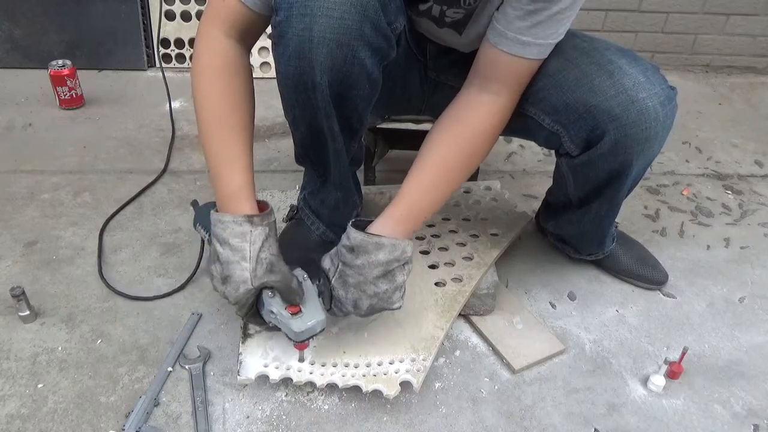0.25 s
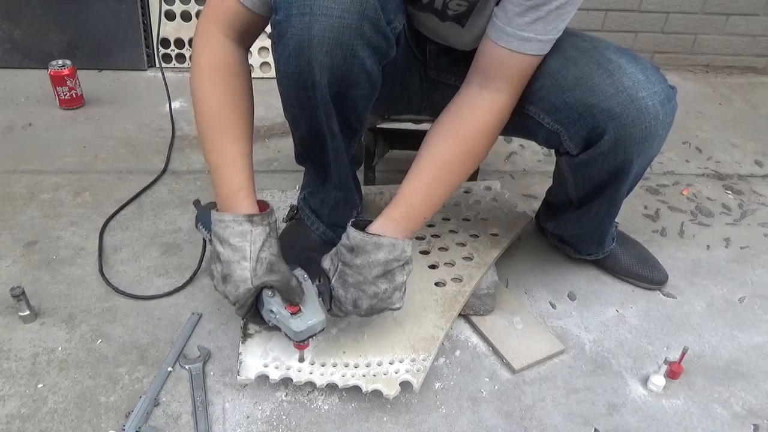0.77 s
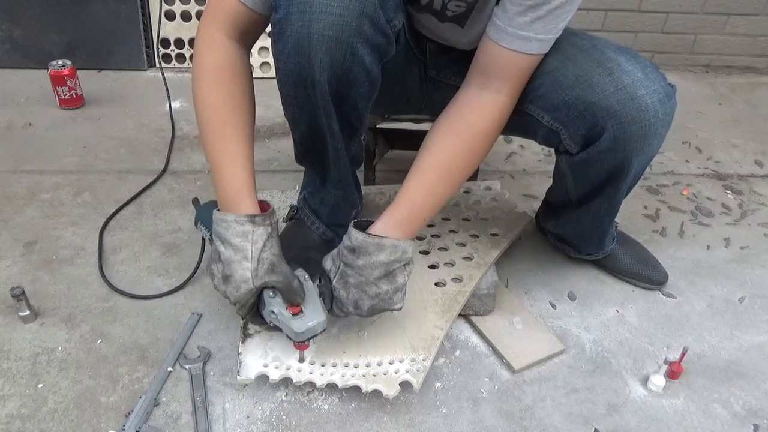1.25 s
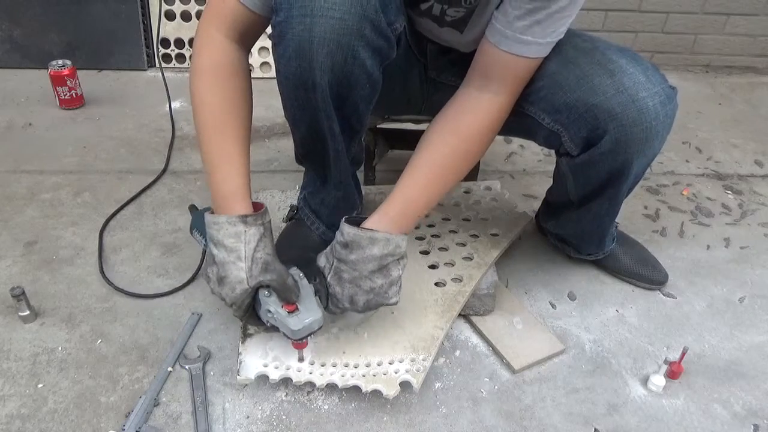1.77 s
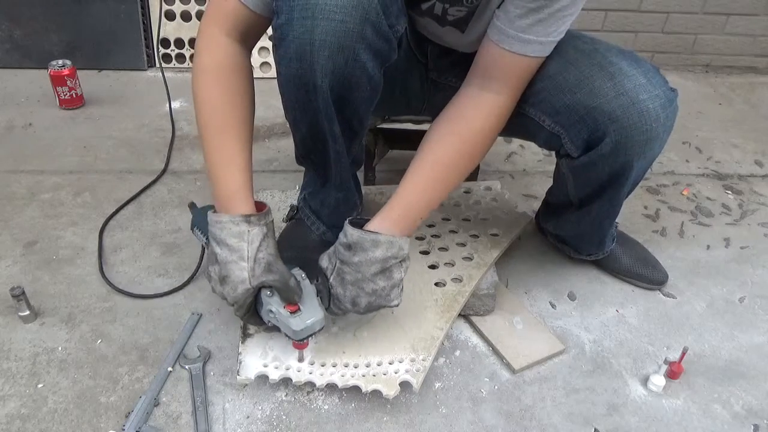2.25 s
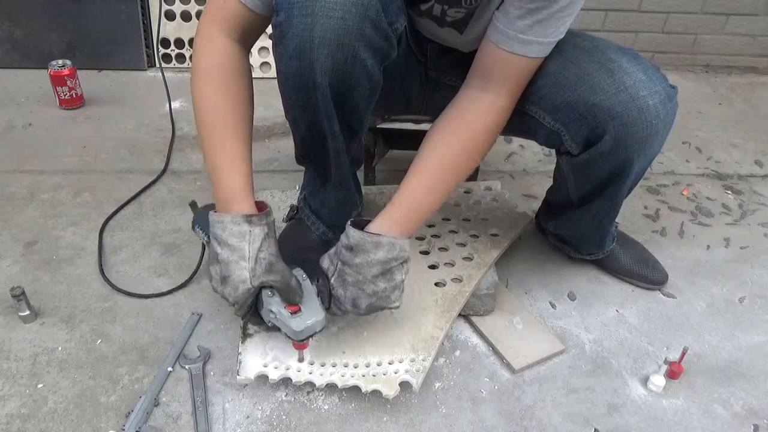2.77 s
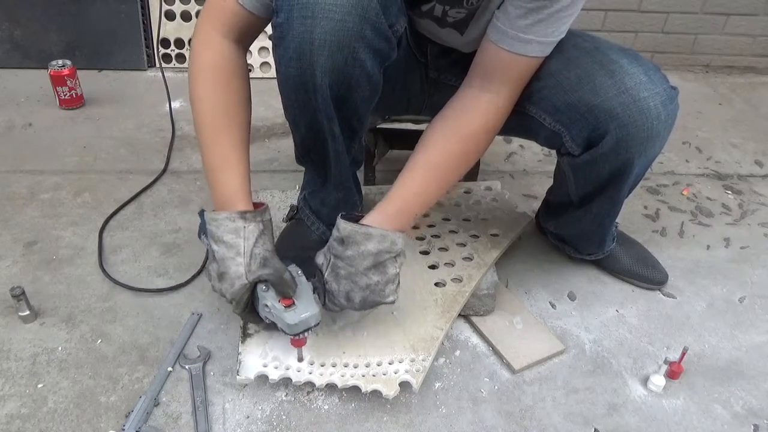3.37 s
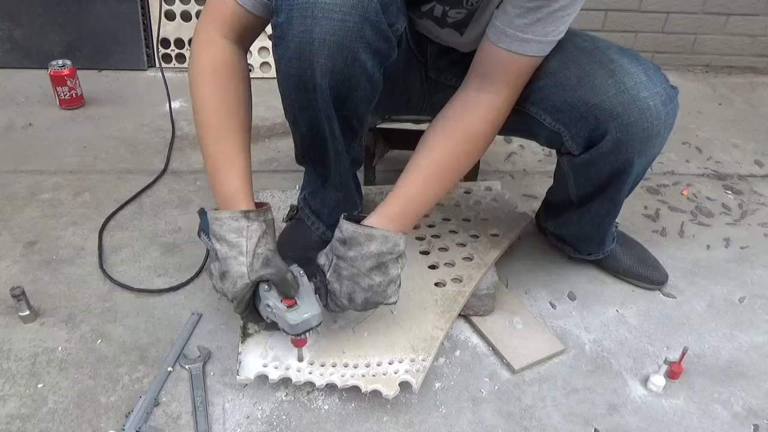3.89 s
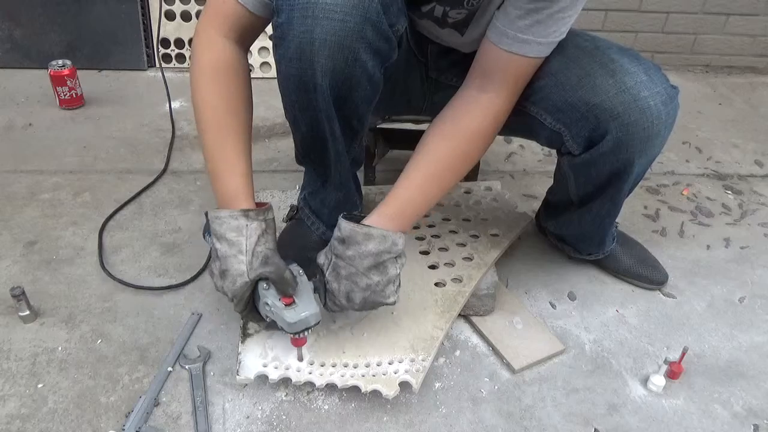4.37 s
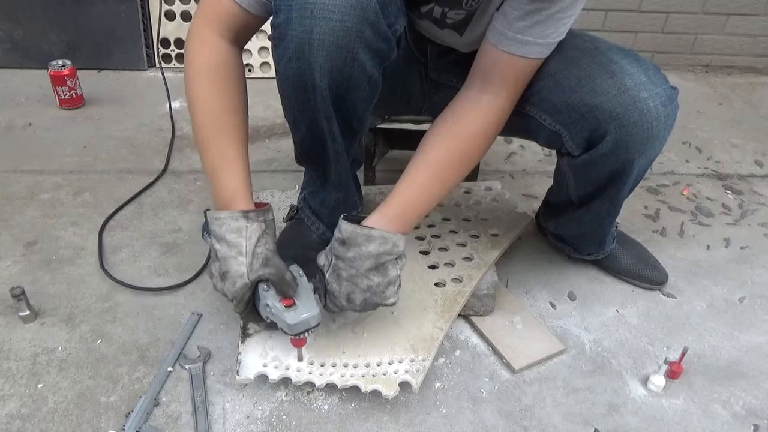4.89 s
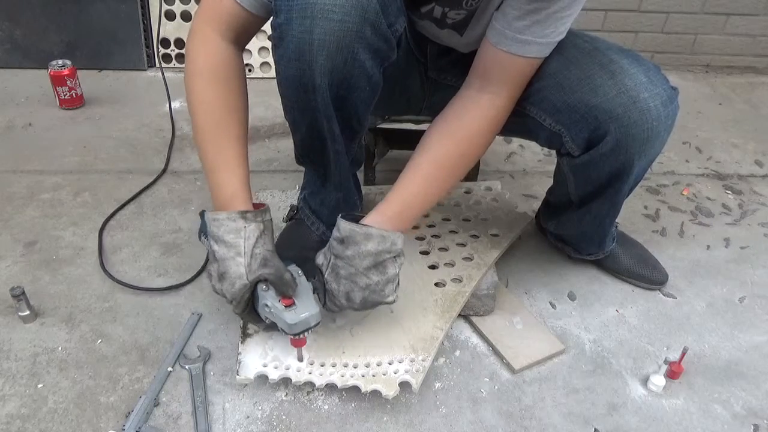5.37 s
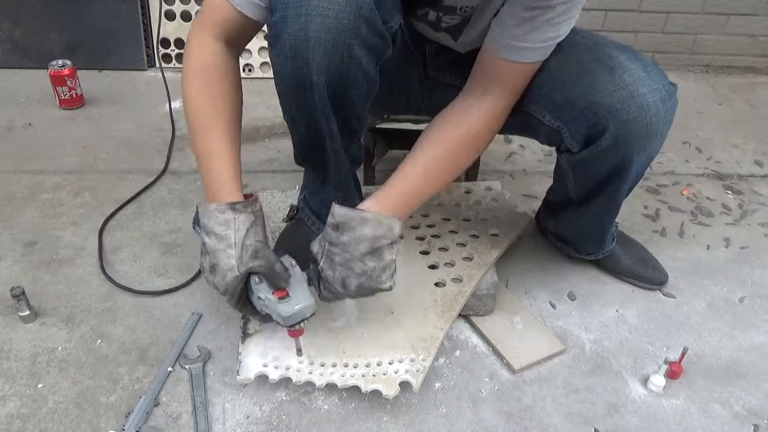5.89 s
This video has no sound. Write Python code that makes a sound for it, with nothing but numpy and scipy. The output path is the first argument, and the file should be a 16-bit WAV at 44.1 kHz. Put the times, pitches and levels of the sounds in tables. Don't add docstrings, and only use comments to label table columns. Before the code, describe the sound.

An angle grinder roars steadily while its core bit grinds into ringing ceramic tile, chattering and squealing, then lifts off and runs free.

```python
import sys
import numpy as np
from scipy import signal
from scipy.fft import rfft, irfft, next_fast_len
from scipy.io import wavfile
from scipy.ndimage import uniform_filter1d

SR = 44100
rng = np.random.default_rng(int(sys.argv[2]) if len(sys.argv) > 2 else 0)


def to_wav(s):
    ch = np.atleast_2d(s).T
    pcm = np.round(np.clip(ch, -1, 1) * 32767)
    wavfile.write(sys.argv[1], SR, pcm.astype(np.int16))


def gain_from_decibels(decibels):
    exponent = np.asarray(decibels, float) / 20
    return 10 ** exponent


N = 270774

# (time [s], spindle rate [turns/s], knock rounds [1/s])
SPEED = [(0, 155, 153), (.9, 154.8, 152.8), (1.3, 154, 152), (1.6, 153.2, 151.5), (2.05, 153.5, 151.3),
         (2.3, 155.2, 153), (2.8, 154.6, 152), (3.3, 154.4, 152), (3.6, 154.6, 153), (3.9, 154, 151.2),
         (4.3, 154.6, 153), (4.6, 153.8, 152), (5.3, 155.2, 152.6), (5.6, 154, 152), (6.14, 156, 153)]
# (time [s], level [dB])
PRESSURE = [
    (0, -23.5),
    (2.2, -24),
    (5.5, -23),
    (5.62, -28.5),
    (5.655, -29),
    (5.75, -33),
    (5.9, -34),
    (6.14, -54),
]
# (time [s], length [s], level [dB])
BITES = [(.15, 0.037, 4), (.26, .25, 1), (.45, 0.05, 2), (.59, .045, -0.5), (.74, 0.099, -2.5),
         (.87, 0.052, 2), (.98, 0.38, 2.5), (1.13, 0.029, 7), (1.25, 0.049, -3.5), (1.58, 0.16, 3.5),
         (1.73, 0.028, -9), (1.87, 0.055, 3), (2.07, 0.052, 4.5), (2.25, 0.062, -4), (2.6, 0.035, 6.5),
         (2.81, .076, 5.5), (3.11, 0.051, -5.5), (3.24, 0.026, -12), (3.73, 0.17, -4), (3.91, 0.039, -7),
         (4.06, 0.1, 4), (4.22, 0.13, -3.5), (4.48, 0.073, -0.5), (4.61, 0.041, -5.5), (4.78, 0.041, 1),
         (4.91, 0.16, -2), (5.2, 0.04, -11), (5.28, 0.04, 1), (5.37, 0.11, -4)]
# (time [s], length [s], level [dB])
GRAZES = [
    (5.78, .04, 9),
    (5.89, .03, 4),
]
# (time [s], length [s], shake lost [dB])
CATCHES = [(0.06, 0.12, 8), (0.34, 0.027, 8.9), (0.4, 0.029, 9), (0.61, 0.129, 13.5), (1.04, 0.031, 20),
           (1.12, 0.064, 12), (1.36, 0.06, 11.5), (1.5, 0.16, 16.5), (1.61, 0.056, 16.5), (1.86, 0.086, 12),
           (2.0, 0.088, 16), (2.37, 0.091, 5), (2.53, 0.082, 9.5), (2.87, 0.032, 6), (3.01, 0.11, 12.5),
           (3.19, 0.044, 9), (3.28, 0.061, 2), (3.46, 0.089, 14), (3.73, 0.077, 8.2), (3.83, 0.028, 8.7),
           (3.97, 0.15, 12), (4.29, 0.037, 11.4), (4.46, 0.1, 19), (4.61, 0.033, 15), (4.67, 0.029, 13),
           (4.85, 0.073, 15), (4.98, 0.05, 18), (5.24, 0.076, -2), (5.45, 0.062, 11)]


def tile(turns):
    # (width [Hz], level [dB])
    low_hz = [232, 388, 458, 545, 604, 685, 763, 840, 911, 995, 1055, 1140]
    low_shapes = [(12, -34), (30, -23.5), (18.4, -16), (29, -14.5), (26.2, -12.5), (37.8, -15), (24.3, -14),
                  (64.8, -19), (28, -12), (44.8, -14.5), (20, -10.5), (70.5, -18)]
    # (width [Hz], level [dB])
    ring_hz = [1222, 1365, 1455, 1525, 1600, 1672, 1750, 1820, 1290]
    ring_shapes = [(45.5, -5.5), (39, -1), (49.4, 1), (45, 4.5), (34.8, 5.5), (40, 5), (60, -1.5), (45, 0),
                   (35, -10)]
    # (width [Hz], level [dB])
    upper_hz = [1990, 2190, 2290, 2415, 2560, 2750, 2891, 3153, 3640, 3855, 4200, 4431, 3935, 2345]
    upper_shapes = [(49.7, 1), (100, -2.5), (46.4, 2), (56, 0.5), (142, -5.5), (32, -3), (35, -3),
                    (35.7, -10.5), (120, -8), (92, -2.5), (70, -8), (31.8, -12.5), (90, -7.5), (59.6, -9)]
    # (time [s], length [s], level [dB])
    drag = [
        (5.69, 0.12, 1),
    ]

    s = np.arange(N) / SR
    push_db = pressure() + jolts()
    bite_db = swells(BITES) + 1.0 * drift(30)
    graze_db = swells(GRAZES)
    ring_db = push_db + 0.48 * bite_db
    flex_db = push_db - 11 - 0.02 * s + 0.3 * bite_db + 0.14 * swells(CATCHES)
    flex_db = flex_db + 2 * free() + swells(drag) - (1 - .65) * graze_db
    bright_db = push_db - 1.95 - 0.1 * s + 0.47 * bite_db - (1 - .4) * graze_db

    grains = grit(turns, per_s=14000, spread_db=2.0, once_db=1.4, twice_db=1.7)
    blows = knocks(uneven_db=5.5, weak_db=8.0, opposite_db=-7.0, jitter_turns=.012)
    low = body(grains + 0.29 * blows, paired(low_hz, low_shapes), flicker_db=1.5, rate_hz=43)
    ring = body(grains + 0.26 * blows, paired(ring_hz, ring_shapes), flicker_db=0.03, rate_hz=11)
    upper = body(grains + 0.38 * blows, paired(upper_hz, upper_shapes), flicker_db=2.0, rate_hz=10.0)

    low = above(flex_db, under_db=-53.5) * low
    ring = above(ring_db, under_db=-31) * ring
    upper = above(bright_db, under_db=-33) * gain_from_decibels(2.0) * upper
    low = signal.sosfilt(signal.butter(2, 240, "high", fs=SR, output="sos"), low)
    return low + rasp(turns) * (ring + upper)


def grit(turns, per_s, spread_db, once_db, twice_db):
    sizes = gain_from_decibels(spread_db * np.minimum(rng.exponential(1, N), 4)) * rng.choice([-1, 1], N)
    breaks = rng.random(N) < per_s / SR
    return rms_one(sizes * breaks * gain_from_decibels(per_turn(turns, once_db, twice_db)))


def knocks(uneven_db, weak_db, opposite_db, jitter_turns):
    rounds = np.cumsum(in_time(SPEED)[1]) / SR + jitter_turns * (drift(22) + 4.0 * drift(4))
    count = np.floor(2 * rounds)
    strength_db = opposite_db * (count % 2) + weak_db * (count % 4 > 1)
    strength_db = strength_db + uneven_db * rng.standard_normal(N)
    return rms_one((np.diff(count, prepend=0) > 0) * gain_from_decibels(strength_db))


def locks(rows, share_db, waver_hz, flutter_db):
    out, s = np.zeros(N), np.arange(N) / SR
    wander = np.cumsum(waver_hz * drift(15.7)) / SR
    flutter = gain_from_decibels(flutter_db * drift(39) + jolts())
    for (at, length, hz, db), start in zip(rows, rng.random((len(rows), 1))):
        near = slice(max(int((at - 2 * length) * SR), 0), int((at + 2 * length) * SR))
        bell = np.exp(-2 * np.log(2) * ((s[near] - at) / length) ** 2)
        tone = np.sin(2 * np.pi * (hz * s[near] + wander[near] + start))
        out[near] += gain_from_decibels(db + share_db) * bell * tone
    return np.sqrt(2) * flutter * out


def rasp(turns):
    return gain_from_decibels(per_turn(turns, once_db=.35, twice_db=.5))


def pressure():
    return in_time(PRESSURE)[0] + swells(GRAZES)


def jolts():
    # (time [s], level [dB])
    jolt_rows = [(.07, 2.5), (.271, -1), (.365, -6), (.648, 1.5), (1.042, 2), (1.196, -3), (1.287, -3),
                 (1.311, 2.5), (1.395, -5), (1.572, 2), (1.957, -5), (2.142, -3), (2.184, 5.5), (2.307, 1),
                 (2.374, -2), (2.736, -2), (2.895, -1.5), (2.924, 4), (3.195, 0.5), (3.288, 3), (3.741, -4),
                 (3.863, 0.5), (4.136, -4), (4.174, 0.5), (4.318, -5.5), (4.36, 3), (4.566, 1.5),
                 (4.677, 2), (4.746, -3), (4.837, -6), (4.871, 1), (5.108, -2), (5.16, 2), (5.335, -1.5),
                 (5.501, 0.5), (5.565, -1.5)]
    length_s = 0.011
    return swells([(at, length_s, db) for at, db in jolt_rows])


def touch():
    return np.clip((in_time(PRESSURE)[0] + 34) / 9, 0, 1)


def free():
    return np.clip((-25.5 - in_time(PRESSURE)[0]) / 13, 0, 1)


def tube():
    # (time [s], pitch [Hz], twin pitch [Hz], twin relative level [dB])
    pair_rows = [(0, 9948, 9820, -6), (1, 9940, 9835, -3), (1.75, 9935, 9830, -2), (2.0, 9925, 9850, -6),
                 (2.3, 9918, 9710, -11), (3.5, 9900, 9710, -11), (6.14, 9908, 9720, -14)]
    # (time [s], length [s], level [dB])
    rub_rows = [(.2, 0.09, 5), (1.0, .1, -4), (1.12, .06, 2), (1.85, .2, -3), (2.28, .09, 7), (2.9, .12, 7),
                (3.08, 0.11, 5), (3.3, .15, -2), (3.55, .14, 2), (4.1, .06, -4), (4.22, .1, 1),
                (4.45, .15, 0), (4.82, .1, 3), (4.98, 0.073, 1), (5.07, .05, -3), (5.2, 0.076, 1),
                (5.5, .12, 1)]

    s = np.arange(N) / SR
    hz, twin_hz, twin_db = in_time(pair_rows)
    wavering_hz = [hz + 25 * drift(30), twin_hz + 22 * drift(15)]
    sing = []
    for phase in 2 * np.pi * np.cumsum(wavering_hz, axis=1) / SR:
        sing.append((1.7 + drift(40)) * np.cos(phase) + drift(40) * np.sin(phase))
    sing_db = -29.5 + 0.43 * s - 0.18 * swells(BITES) + swells(rub_rows)
    sing_db = sing_db - 14 * np.clip((s - 5.68) / .04, 0, 1)
    return gain_from_decibels(-4.0) * above(sing_db, under_db=-52) * (sing[0] + gain_from_decibels(twin_db) * sing[1])


def wobble(turns, tone_hz, tone_db):
    # (time [s], length [s], level [dB])
    tilt_rows = [(.25, .08, -5), (.97, .08, -1), (1.28, 0.18, 4), (1.8, .08, 4), (1.94, .08, 2),
                 (2.15, 0.17, -3), (2.56, .12, -8), (3.3, .1, 3), (3.71, .15, 4), (4.06, .1, -5),
                 (4.26, .14, 6), (4.56, 0.087, -10), (5.3, .1, 2), (5.62, 0.14, 5)]

    once = gain_from_decibels(-67.5 + swells(tilt_rows) + 12 * free()) * np.sin(2 * np.pi * turns + 0.53 * drift(3.4))
    half = gain_from_decibels(-73.5 + 4.0 * drift(5.5)) * np.sin(3 * np.pi * turns + drift(6.2))
    hum = gain_from_decibels(-63) * drift(7.0) * np.sin(2 * np.pi * 295 * np.arange(N) / SR)
    twice = gain_from_decibels(tone_db) * np.sin(np.pi * (2 * turns + np.cumsum(tone_hz) / SR))
    return np.sqrt(2) * touch() * (once + half + hum + touch() * twice)


def machine(turns):
    # (frequency [Hz], level [dB per Hz])
    roar_spectrum = [(8.2, -88), (14, -54), (32, -36), (53, -33.5), (163, -33), (248, -27), (376, -27),
                     (900, -20), (1250, -9.5), (2120, -7), (3220, -4.5), (3920, -8), (4510, -4.5),
                     (6660, -4), (11000, 1), (14300, -32), (22000, -120)]
    # (width [Hz], level [dB])
    guard_hz = [4820, 5350, 6030, 6300, 6570, 6820, 7120, 7800, 8180, 8520]
    guard_shapes = [(42, -7), (55, -1), (39, -4), (131, 1.5), (177, 3.5), (120, 3), (80, 0.5), (150, -31),
                    (45, -12), (50, -5)]
    # (width [Hz], level [dB])
    whirr_hz = [9720, 10525, 10950, 10300]
    whirr_shapes = [(140, 2), (110, 15), (250, 10), (500, 3.5)]

    unloaded = free()
    roar_db = -20 + 0.5 * unloaded
    case_db = 0.16 + 1 * unloaded
    whirr_db = -9.5 + 0.63 * np.arange(N) / SR + 1.5 * unloaded

    edges_hz = 14 * 2 ** np.arange(0, 10, 1 / 3)
    white, together, hiss = rng.standard_normal((2, N)), drift(3.4), 0
    for k, (low, high) in enumerate(zip(edges_hz, edges_hz[1:])):
        band = signal.sosfilt(signal.butter(2, [low, high], "band", fs=SR, output="sos"), white[k % 2])
        tilt_db = 0.6 * max(np.log2(low / 3000), 0) * unloaded
        flicker_db = 0.45 * together + 1.23 * drift(29)
        hiss = hiss + band * gain_from_decibels(at_hz(roar_spectrum, np.sqrt(low * high)) + tilt_db + flicker_db)

    rattle = body(rng.standard_normal(N), paired(guard_hz, guard_shapes), flicker_db=2.5, rate_hz=45)
    whirr = body(rng.standard_normal(N), paired(whirr_hz, whirr_shapes), flicker_db=-2.0, rate_hz=5.0)
    roar_db = roar_db + 0.23 * jolts() + per_turn(turns, once_db=.15, twice_db=.2)
    mixed = gain_from_decibels(1.0) * rms_one(hiss) + gain_from_decibels(case_db - 7.0) * rattle + gain_from_decibels(whirr_db - 3) * whirr
    return gain_from_decibels(roar_db) * mixed


def yard(x):
    # (frequency [Hz], coherence [0-1])
    likeness = [(30, .998), (60, .96), (150, .87), (330, .86), (700, .95), (1420, .978), (4060, .93),
                (11000, .96)]
    # (frequency [Hz], level [dB])
    lean_rows = [(60, 0), (2500, 0), (5500, .6), (11000, .93)]

    size = next_fast_len(N + SR)
    hz = np.maximum(np.arange(size // 2 + 1) * SR / size, 10)
    tail_s = np.arange(SR // 2) / SR
    echoes = rng.standard_normal((2, len(tail_s))) * gain_from_decibels(-60 * tail_s / .5)
    echoes = echoes / np.sqrt(np.sum(echoes[0] ** 2))
    alike = np.clip(at_hz(likeness, hz), 0, .999)
    scatter = np.sqrt((1 - alike) / (1 + alike)) * rfft(echoes, size)
    spectrum, lean = rfft(x, size), gain_from_decibels(at_hz(lean_rows, hz) / 2)
    first, second = irfft(spectrum * scatter, size)[:, :N]
    sway = np.pi * drift(1.2)
    side = first * np.cos(sway) + second * np.sin(sway)
    direct = irfft(spectrum * np.array([lean, 1 / lean]), size)[:, :N]
    return direct + side * [[1], [-1]]


def body(x, modes, flicker_db, rate_hz):
    out = 0
    for k, (hz, width_hz, db) in enumerate(modes):
        drive = x * gain_from_decibels(flicker_db * drift(rate_hz))
        out = out + (-1) ** k * gain_from_decibels(db) * resonate(drive, hz, width_hz)
    return rms_one(out)


def resonate(x, hz, width_hz):
    r = np.exp(-np.pi * width_hz / SR)
    poles = [1, -2 * r * np.cos(2 * np.pi * hz / SR), r * r]
    return signal.lfilter([(1 - r * r) / 2, 0, (r * r - 1) / 2], poles, x)


def paired(pitches, shapes):
    return [(hz, *shape) for hz, shape in zip(pitches, shapes)]


def per_turn(turns, once_db, twice_db):
    return once_db * np.cos(2 * np.pi * turns) + twice_db * np.cos(4 * np.pi * turns)


def drift(rate_hz):
    r = np.exp(-40 * np.pi * rate_hz / SR)
    slow = signal.lfilter([1], [1, -2 * r, r * r], rng.standard_normal(N // 20 + 4002))[4000:]
    return np.interp(np.arange(N) / 20, np.arange(len(slow)), rms_one(slow))


def swells(rows):
    s = np.arange(0, N + 64, 64) / SR
    bells = sum(db * np.exp(-4 * np.log(2) * ((s - at) / length) ** 2) for at, length, db in rows)
    return np.interp(np.arange(N) / SR, s, bells)


def in_time(rows):
    s, *columns = np.transpose(rows)
    return [np.interp(np.arange(N) / SR, s, c) for c in columns]


def at_hz(points, hz):
    point_hz, values = np.transpose(points)
    return np.interp(np.log(hz), np.log(point_hz), values)


def above(db, under_db):
    return np.sqrt(np.maximum(gain_from_decibels(db) ** 2 - gain_from_decibels(under_db) ** 2, 0))


def rms_one(x):
    return x / np.sqrt(np.mean(x ** 2) + 1e-20)


def scene():
    # (time [s], length [s], pitch [Hz], level [dB])
    low_locks = [(0.41, 0.14, 602, -37), (0.44, 0.055, 904, -34), (0.87, 0.12, 915, -35),
                 (0.9, 0.15, 608, -38.5), (1.04, 0.23, 586, -50), (1.13, 0.06, 1049, -38),
                 (1.29, 0.061, 543, -36), (1.34, 0.2, 597, -44), (1.44, 0.35, 597, -52),
                 (1.46, 0.13, 1055, -37), (1.48, 0.065, 452, -43), (1.58, 0.2, 1055, -41),
                 (1.59, 0.14, 899, -48), (1.86, 0.076, 904, -36), (1.87, 0.16, 597, -37.5),
                 (2.03, 0.049, 904, -34), (2.04, 0.13, 1055, -36.5), (2.32, 0.078, 920, -36),
                 (2.33, 0.12, 608, -36.5), (2.49, 0.063, 1060, -35), (2.77, 0.15, 602, -38),
                 (2.79, 0.18, 904, -37.5), (3.07, 0.12, 452, -45), (3.28, 0.18, 597, -40),
                 (3.34, 0.055, 909, -35.5), (3.45, 0.18, 1044, -36.5), (3.46, 0.24, 608, -51),
                 (3.58, 0.053, 457, -41), (3.84, 0.21, 592, -38), (3.94, 0.2, 1044, -40),
                 (4.03, 0.068, 899, -36), (4.09, 0.12, 452, -50), (4.33, 0.11, 592, -36),
                 (4.48, 0.041, 586, -38), (4.48, 0.074, 995, -37), (4.78, 0.053, 764, -35.5),
                 (4.83, 0.051, 538, -37), (4.97, 0.11, 1049, -46), (5.58, 0.033, 549, -33),
                 (5.61, 0.031, 457, -41)]
    ring_locks = [(0.09, 0.11, 1378, -34), (0.13, 0.2, 1981, -31), (0.15, 0.15, 2298, -33),
                  (0.17, 0.07, 2379, -31), (0.24, 0.1, 2013, -30), (0.24, 0.2, 1695, -31),
                  (0.31, 0.16, 2287, -33), (0.4, 0.12, 2411, -31), (0.51, 0.16, 1986, -31),
                  (0.87, 0.12, 1528, -28), (0.88, 0.2, 1997, -34), (1.0, 0.2, 1598, -30),
                  (1.11, 0.18, 1367, -32), (1.17, 0.11, 2007, -34), (1.3, 0.2, 2002, -35),
                  (1.41, 0.2, 1986, -36), (1.52, 0.2, 1598, -29), (1.58, 0.1, 1356, -31),
                  (1.59, 0.14, 1964, -34), (1.65, 0.1, 2395, -33), (1.85, 0.2, 1964, -34),
                  (1.89, 0.05, 1496, -30), (1.93, 0.05, 2438, -33), (2.04, 0.08, 1356, -35),
                  (2.05, 0.2, 1964, -34), (2.08, 0.09, 2411, -33), (2.1, 0.11, 1760, -32),
                  (2.19, 0.1, 2007, -33), (2.29, 0.2, 2002, -34), (2.4, 0.2, 2007, -35),
                  (2.66, 0.2, 2013, -33), (2.77, 0.2, 1986, -34), (2.78, 0.07, 2271, -31),
                  (3.19, 0.17, 2282, -33), (3.19, 0.2, 1674, -31), (3.21, 0.17, 1986, -34),
                  (3.61, 0.08, 1997, -34), (4.03, 0.12, 1367, -32), (4.11, 0.2, 1975, -35),
                  (4.25, 0.2, 1991, -34), (4.38, 0.2, 1997, -34), (4.46, 0.07, 1598, -30),
                  (4.56, 0.2, 1986, -31), (4.78, 0.1, 1749, -33), (4.79, 0.2, 1598, -30),
                  (4.94, 0.2, 1986, -35), (5.06, 0.06, 2374, -32), (5.28, 0.09, 1986, -31),
                  (5.29, 0.08, 2298, -31), (5.5, 0.06, 1997, -34)]
    upper_locks = [(0.05, 0.05, 4193, -38), (0.15, 0.05, 4435, -37), (0.33, 0.05, 2890, -34),
                   (0.41, 0.11, 4425, -35), (0.44, 0.06, 2890, -35), (0.55, 0.08, 3154, -38),
                   (0.56, 0.08, 4435, -38), (0.67, 0.11, 3854, -36), (0.86, 0.06, 2901, -33),
                   (0.88, 0.08, 4435, -36), (0.89, 0.09, 2750, -36), (1.06, 0.14, 3849, -36),
                   (1.24, 0.12, 3154, -39), (1.31, 0.1, 2885, -35), (1.38, 0.16, 4435, -38),
                   (1.61, 0.13, 4419, -40), (1.83, 0.06, 4435, -35), (1.92, 0.05, 3612, -38),
                   (2.03, 0.09, 3639, -37), (2.46, 0.07, 4198, -39), (2.68, 0.13, 3170, -39),
                   (2.72, 0.2, 2901, -36), (2.77, 0.11, 4435, -38), (3.32, 0.11, 4430, -38),
                   (3.83, 0.05, 3159, -40), (3.84, 0.07, 4425, -38), (5.04, 0.08, 3832, -37),
                   (5.24, 0.06, 3832, -36), (5.3, 0.05, 4430, -38), (5.49, 0.07, 4414, -40)]

    speed, caught_db = in_time(SPEED)[0], swells(CATCHES)
    turns = np.cumsum(speed) / SR
    sung = locks(low_locks, share_db=-2, waver_hz=4.18, flutter_db=0.74)
    sung = sung + rasp(turns) * locks(ring_locks, share_db=0, waver_hz=8.15, flutter_db=1.7)
    sung = sung + locks(upper_locks, share_db=1, waver_hz=13.96, flutter_db=4.4)
    tone_hz = 2 * speed - .5 * caught_db + 2.5 + 4 * drift(15)
    tone_db = -52 - caught_db + 2 * drift(9.1)
    return yard(tile(turns) + sung + tube() + wobble(turns, tone_hz, tone_db) + machine(turns))


def roll_off(x):
    return signal.sosfilt(signal.butter(12, 12240, fs=SR, output="sos"), x)


def record(dry):
    power = uniform_filter1d(np.mean(dry ** 2, axis=0), int(0.011 * SR))
    ridden = dry * (power / np.mean(power) + 1e-6) ** -.12
    ridden = 1.3 * np.tanh(ridden / 1.3)
    over_hz = np.maximum(np.arange(N // 2 + 1) * SR / N - 11006, 0)
    cut_db = np.maximum(-.5 * over_hz, -140)
    cut = irfft(rfft(ridden) * gain_from_decibels(cut_db), N)
    return roll_off(cut)


dry = scene()
out = record(dry)
to_wav(out)
```